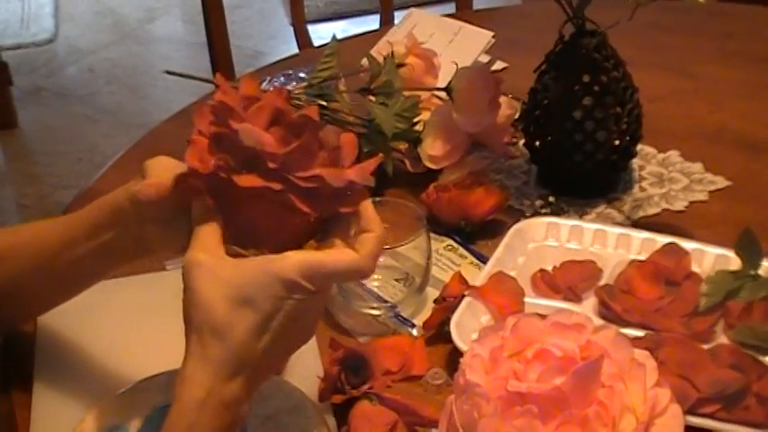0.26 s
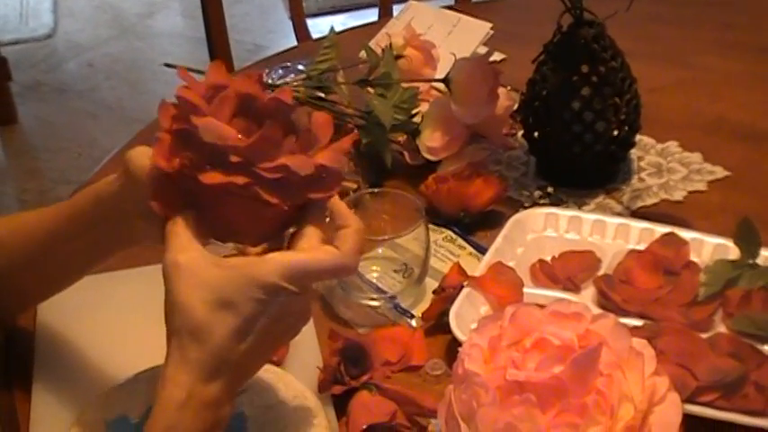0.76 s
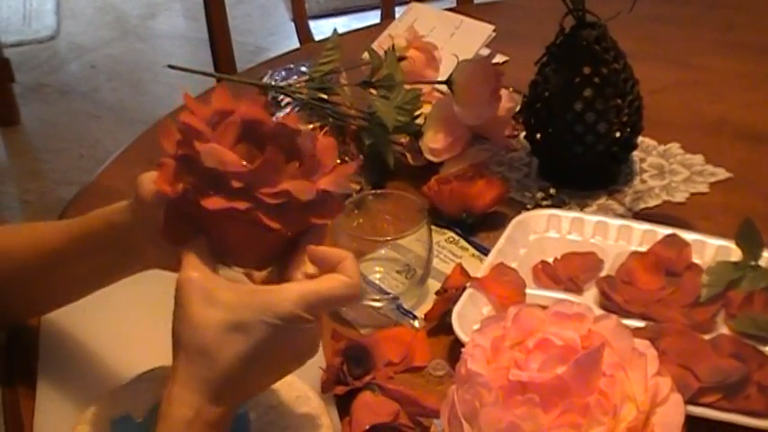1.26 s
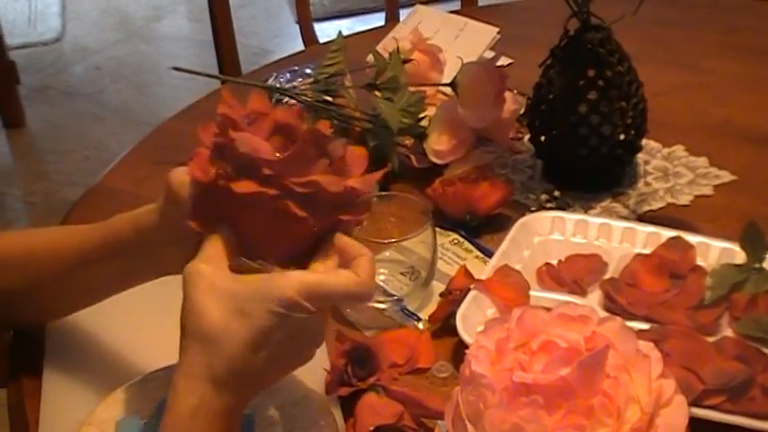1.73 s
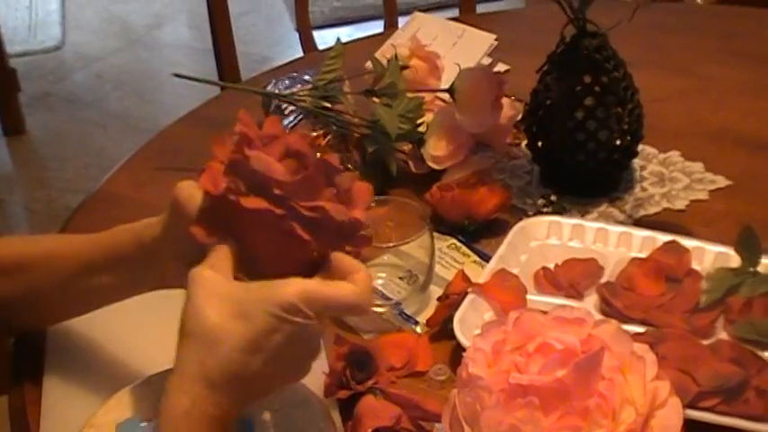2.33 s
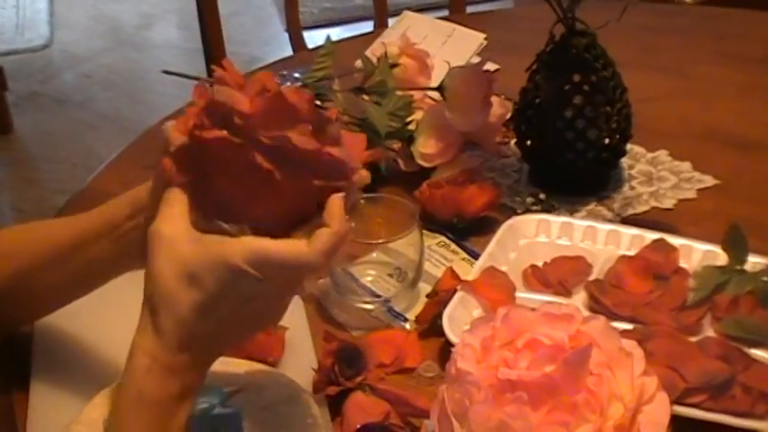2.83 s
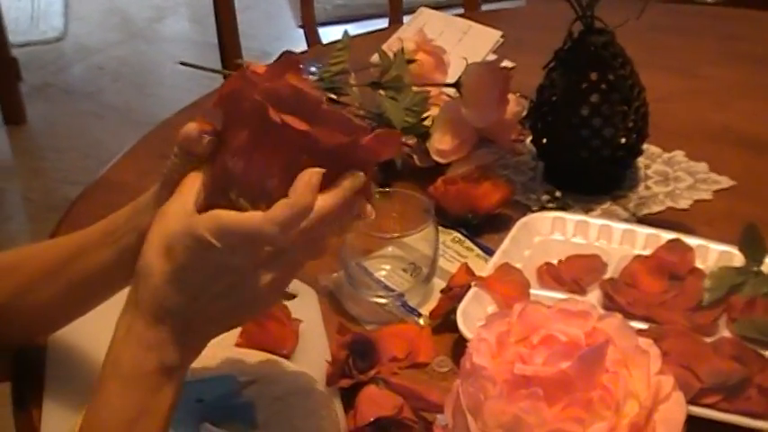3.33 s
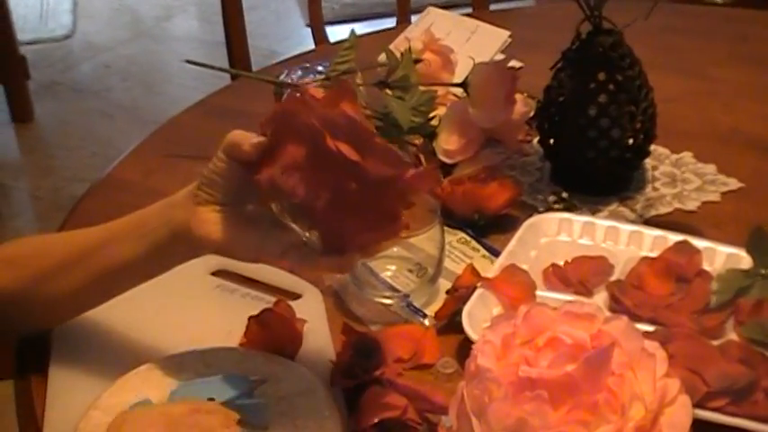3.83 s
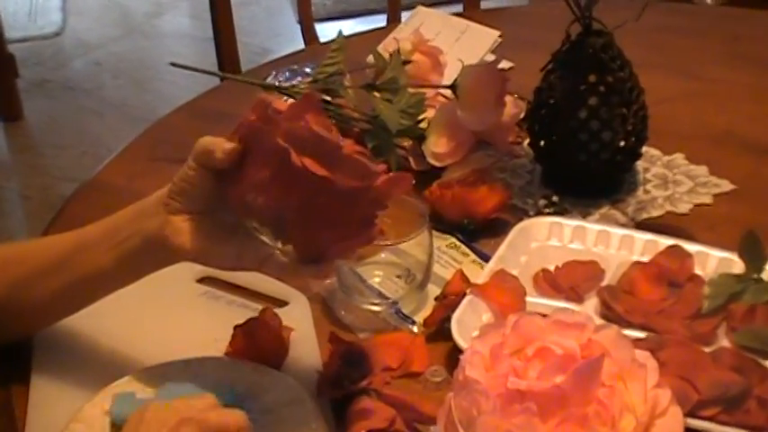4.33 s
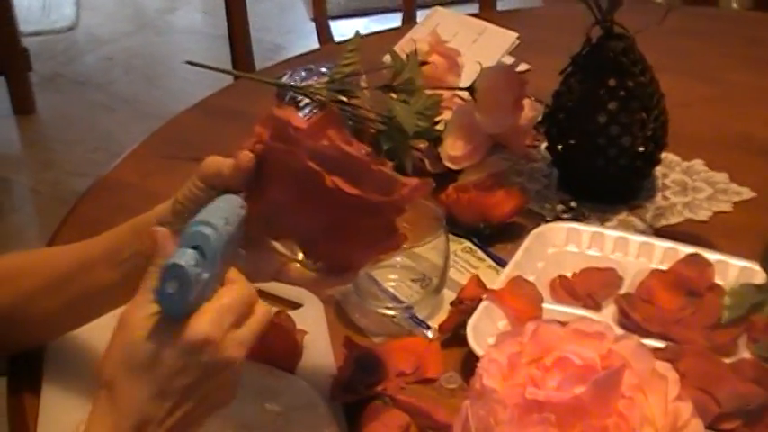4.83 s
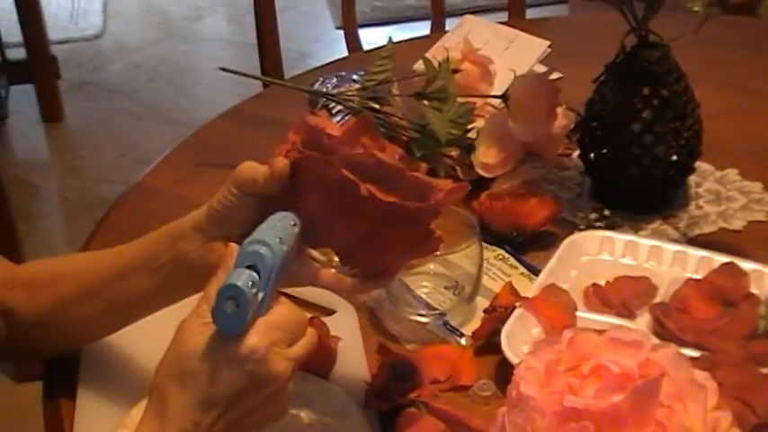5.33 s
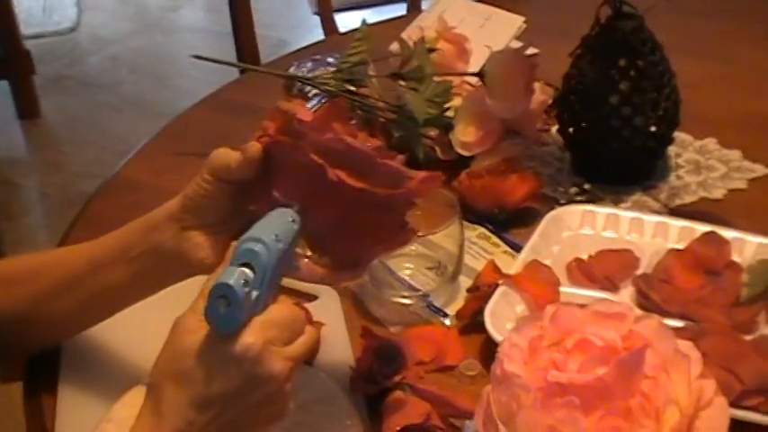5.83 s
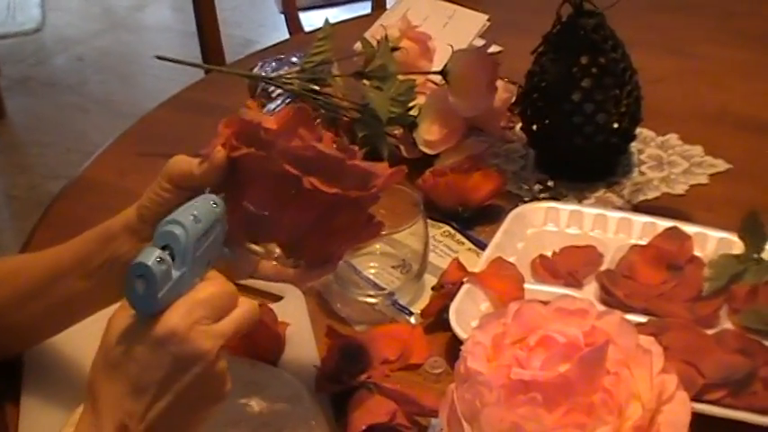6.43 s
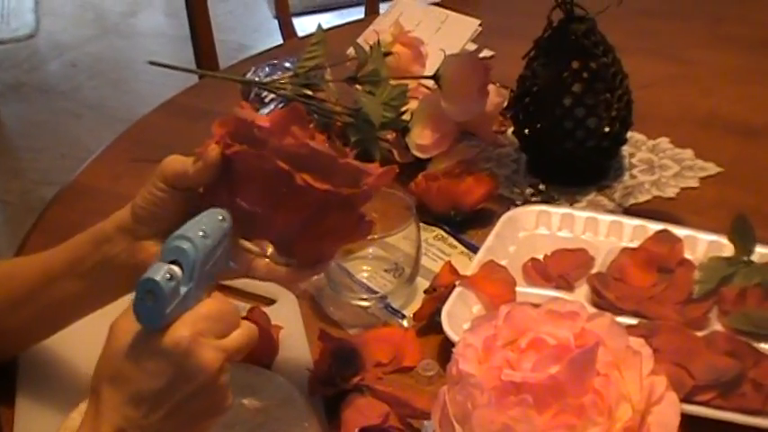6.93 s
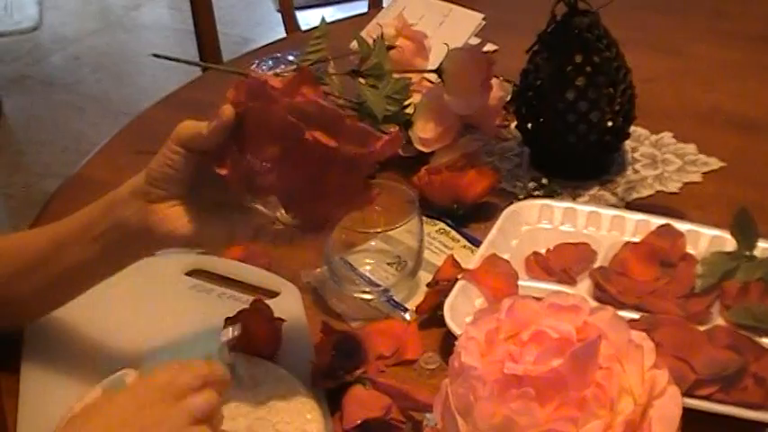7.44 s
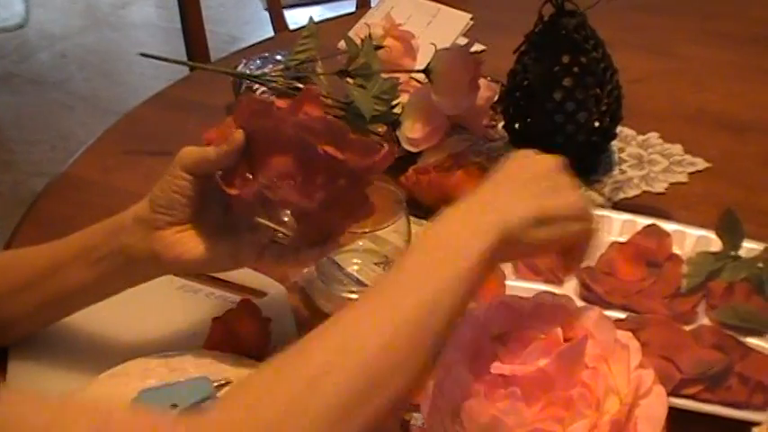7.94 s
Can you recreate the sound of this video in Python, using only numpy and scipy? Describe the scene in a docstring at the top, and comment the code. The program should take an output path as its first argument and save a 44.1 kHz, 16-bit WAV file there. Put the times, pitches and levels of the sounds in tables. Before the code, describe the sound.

Close up at a wooden table, hands turn a silk flower with soft, grainy, hissing rustles and a few tiny ticks. Midway a plastic glue gun is picked up with light clicks and faint ceramic tings, then one sharp snap. After a quiet stretch it clatters back onto a dish with a loud clack, thump and short ring. A low steady motor and fan hum with soft air noise fills the lively, hard-walled room.

```python
"""Hands turn a silk flower and rustle its petals: grainy, hissing noise swells with every stroke.
A plastic glue gun and fingernails click (short pitched rattles) at a wooden table (a bank of resonances).
The gun squeaks faintly, rings a ceramic dish (decaying sines) and lands with a thump (one short push).
A hard-walled room answers with early reflections and a noise tail.
An appliance motor and a fan hum (wavering sines) over the rush of air (coloured noise)."""
import sys
import numpy as np
from scipy import signal
from scipy.fft import rfft, irfft, next_fast_len
from scipy.io import wavfile
from scipy.ndimage import map_coordinates

SR = 44100
rng = np.random.default_rng(int(sys.argv[2]) if len(sys.argv) > 2 else 0)


def field_ratio(decibels):
    """Amplitude ratio for a level in dB (20 dB per decade); scalars and array-likes work."""
    return 10 ** (np.asarray(decibels, dtype=float) / 20)


def inscribe(sig):
    """Save sig as 16-bit PCM at rate SR to the path in sys.argv[1].

    A 1-D sig is mono; a 2-D sig holds one channel per row.
    Samples are clipped to [-1, 1] before scaling.
    """
    pcm = np.round(np.clip(np.atleast_2d(sig).T, -1, 1) * 32767)
    wavfile.write(sys.argv[1], SR, pcm.astype(np.int16))


N = 360730  # length in samples

# Fingers slide over silk or plastic. Each row: peak time in seconds, rise in seconds, fall in seconds,
# rustle level in dB, dull scrape against the rustle in dB.
HAND_STROKES = [(.04, 0.13, 0.077, -55.5, -6.5), (.25, 0.12, 0.16, -64.5, -4),
                (.53, 0.075, 0.077, -58, -10), (.71, .04, .07, -69, -2), (.815, 0.04, 0.076, -65.5, -6),
                (1.03, 0.026, 0.057, -70, 0), (1.2, .1, 0.032, -68.5, -12),
                (1.43, 0.038, 0.053, -51.5, -13.5), (1.72, 0.036, 0.033, -57, -16),
                (2.22, 0.031, 0.018, -59.5, -11), (2.34, 0.031, 0.12, -58, -11),
                (2.51, 0.076, 0.056, -57, -6.5), (2.65, 0.042, 0.059, -53.5, -8.5),
                (2.8, 0.018, 0.032, -54, -13), (2.88, .05, 0.12, -58, -8), (3.36, 0.035, 0.059, -56, -7),
                (3.755, 0.035, 0.012, -62, 2.5), (3.826, 0.041, 0.01, -57.5, -1), (3.93, 0.068, .2, -68, 2),
                (4.05, 0.072, 0.022, -60, -6), (4.18, 0.059, 0.083, -58.5, -5),
                (4.245, 0.019, 0.025, -59, 7), (4.33, .1, 0.068, -60.5, 0),
                (4.455, 0.097, 0.095, -54.5, -0.5), (4.77, 0.13, 0.1, -58, -6), (5.15, 0.22, 0.1, -73, 6),
                (5.49, .06, 0.037, -68.5, 7), (5.556, 0.088, 0.089, -68, 0.5),
                (5.98, 0.067, 0.06, -64, 10.5), (6.992, .02, .02, -71, -11), (6.06, 0.044, 0.048, -72, 13),
                (7.14, 0.096, 0.12, -61, 3.5), (7.33, 0.06, 0.28, -62, 6.5), (7.437, 0.028, 0.025, -51, 3),
                (7.49, 0.062, 0.66, -58, 1)]
# Light contact of the hands between strokes. Each row: time in seconds, rustle level in dB,
# dull scrape against the rustle in dB.
HAND_GRIP = [(0, -76.5, 5.5), (1.35, -69.5, -3.5), (1.55, -80, 3), (2.1, -75.5, -5), (3.05, -65, -3),
             (3.3, -68, -5), (3.47, -77.5, 2), (3.7, -70.5, 0.5), (4.9, -70, 5.5), (5.2, -86, 5.5),
             (6.1, -80, 9.5), (6.9, -85.5, 8.5), (7.8, -92, 10), (8.18, -77, 7)]
# Clicks of plastic and fingernails. Each row: start in seconds, level in dB, centre in Hz,
# table knock level in dB, time to fall 60 dB in seconds.
PLASTIC_CLICKS = [(1.0206, -47, 7000, -66, 0.005), (1.04, -38.5, 7840, -57, 0.018),
                  (2.52, -47, 3500, -62, 0.005), (2.64, -45, 2800, -60, 0.006),
                  (2.782, -41, 7650, -67, 0.0074), (2.803, -46, 7600, -69, 0.0099),
                  (3.385, -49, 3000, -60, 0.005), (3.726, -44, 4740, -65, 0.0066),
                  (3.7453, -36.5, 4800, -63, 0.011), (3.807, -42, 4810, -66, 0.0098),
                  (3.825, -48, 8160, -65, 0.01), (3.998, -43.5, 3120, -58, 0.008),
                  (4.0971, -46, 8060, -65, 0.006), (4.1545, -45, 2490, -50, 0.0086),
                  (4.2424, -38.5, 2300, -45, 0.0082), (4.455, -38, 2980, -58, 0.0057),
                  (4.5404, -41, 2470, -49, 0.011), (4.6963, -40, 2560, -48, 0.006),
                  (4.964, -34.5, 2820, -52, 0.0089), (5.035, -22, 3250, -42, 0.006),
                  (5.2517, -7.5, 3940, -36, 0.0048), (5.905, -30.5, 2350, -32, 0.0039),
                  (5.93, -45, 5500, -60, 0.006), (5.939, -30.5, 2530, -44, 0.011),
                  (5.9578, -22, 7500, -41, 0.0052), (5.9729, -29, 2720, -42, 0.0078),
                  (5.9748, -24, 2350, -45, 0.024), (6.0025, -38, 7000, -52, 0.005),
                  (6.0685, -39, 2330, -48, 0.019), (6.4218, -25, 3220, -46.5, 0.0044),
                  (6.5735, -40, 5900, -75, 0.0055), (7.0524, -39, 2320, -38.5, 0.011),
                  (7.081, -49, 7000, -58, 0.0054), (7.0917, -38, 3230, -55, 0.007),
                  (7.1172, -31, 2870, -52, 0.0086), (7.131, -29.5, 2500, -44, 0.024),
                  (7.237, -45, 2520, -49, 0.0068), (7.302, -41, 2820, -50, 0.0049),
                  (7.34, -28, 3030, -41.5, 0.018), (7.3687, -37, 2500, -43, 0.047),
                  (7.434, -37, 2440, -45, 0.004), (7.496, 0, 3600, -20.5, 0.003),
                  (7.5203, -13, 3570, -28.5, 0.0083), (7.6043, -11.5, 3200, -33, 0.0079),
                  (7.611, -4.5, 3400, -28, 0.012)]
# The table top under a knock. Each row: resonance in Hz, width in Hz, relative level in dB.
TABLE_MODES = [(410, 190, -13), (634, 160, -4), (832, 150, 0), (1034, 74, 7.5), (1149, 22, 11),
               (1287, 54, 10), (1480, 62, 7)]
# The gun touches the dish. Each row: start in seconds, ring level in dB,
# lift of the modes above 4 kHz in dB.
DISH_TOUCHES = [(3.726, -55, 1), (3.7475, -62, 19), (3.81, -64, 13), (3.822, -52, 0), (3.978, -59, -6),
                (4.0201, -62, -6), (7.4962, -30, -6), (7.6115, -19.5, 0)]
# Ringing modes of the dish. Each row: pitch in Hz, relative level in dB, time to fall 60 dB in seconds.
DISH_MODES = [(2089, 0, .27), (2090, -13, .5), (2123, -20, .2), (3495, -7, .11), (4790, -11, .12),
              (4793, -21, .45), (6051, -26, .25), (7780, -22, .08), (8100, -24, .08)]
# First reflections in the room. Each row: delay in seconds, level in dB.
WALL_ECHOES = [(.0032, -21), (.0085, -25), (.0133, -25), (.0172, -14), (.029, -24), (.034, -22)]
# Decay of the room tail. Each row: frequency in Hz, time to fall 60 dB in seconds.
ROOM_DECAY = [(500, 0.34), (1200, 1), (2200, 0.49), (5000, 0.46), (10000, 0.26), (13000, 0.13),
              (16000, 0.064)]
# Stereo width of the room tail. Each row: frequency in Hz, left-right likeness (1 = identical).
ROOM_LIKENESS = [(500, 0.98), (2000, 0.87), (4500, 0.86), (8000, 0.36), (12000, 0.095)]
# Microphone response to close sounds. Each row: frequency in Hz, gain in dB.
MIC_RESPONSE = [(1000, 1), (9000, -2), (16000, -33.5)]
# Mains buzz. Each row: multiple of its base pitch, level in dB.
MAINS_HARMONICS = [(1, -54.5), (2, -58), (3, -85.5), (5, -77)]
# Shaft orders of the motor. Each row: multiple of its base pitch, level in dB.
MOTOR_ORDERS = [(1, -75), (2, -72), (3, -74), (4, -66.5), (5, -66), (6, -76.5), (7, -71), (8, -71.5),
                (9, -96)]
# Weaker tones beside them. Each row: pitch in Hz, level in dB.
WEAK_TONES = [(76.6, -75), (111.35, -75), (117.84, -70), (177.97, -71), (180.95, -72), (297.97, -73),
              (348.2, -76), (418, -78)]
# Colour of the room air. Each row: frequency in Hz, relative level in dB.
AIR_COLOUR = [(15, -50), (30, -27), (50, -14), (140, -15), (255, -9.5), (330, -14), (430, -13.5),
              (560, -18), (690, -16), (1200, -24), (1650, -28), (7300, -44), (14000, -54), (16000, -66.5)]
# Stereo width of the room air. Each row: frequency in Hz, left-right likeness (below 0 = opposed).
AIR_LIKENESS = [(60, 0.42), (150, 0.4), (380, 0.41), (950, 0.076), (2380, -0.46), (5980, -0.32),
                (15000, -0.1)]


def unit(x):
    """Scales a signal to rms 1."""
    return x / np.sqrt(np.mean(x ** 2) + 1e-20)


def along(points, hz):
    """Reads a curve of (Hz, value) points on a log frequency axis."""
    f, value = np.transpose(points)
    return np.interp(np.log(hz + 1), np.log(f + 1), value)


def wobble(rate):
    """Draws a smooth random curve with rate knots a second."""
    knots = rng.standard_normal(int(N * rate / SR) + 4)
    return map_coordinates(knots, [np.arange(N) * rate / SR])


def filtered(x, response):
    """Multiplies the spectrum of x by a complex response of frequency."""
    m = next_fast_len(x.shape[-1] + 8192)
    return irfft(rfft(x, m) * response(np.fft.rfftfreq(m, 1 / SR)), m)[..., :x.shape[-1]]


def peak(f, hz, width):
    """Response of a causal resonance at hz."""
    return 1j * f * width / (hz * hz - f * f + 1j * f * width)


def spread(pair, spectrum, likeness):
    """Makes two unrelated signals into a coloured left and right of the given likeness."""
    def mid_side_gains(hz):
        turn = np.arccos(np.clip(along(likeness, hz), -1, 1)) / 2
        return field_ratio(along(spectrum, hz)) * [np.cos(turn), np.sin(turn)]
    mid, side = filtered(pair, mid_side_gains)
    return np.array([mid + side, mid - side])


def petals():
    """Fibres slip in dense tiny grains over a hiss; a duller scrape and ticking petal edges join in."""
    fidget_db, fidget_rate = 3.5, 9.6  # the grip shifts at random: depth, knots a second
    swell_db, roundness = 15, 2.2  # level gained over a rise and lost over a fall; 1 = pointed peak
    sheen_db = 9  # strokes lift the top of the rustle against the resting grip
    slip_rate = 1500  # fibre slips a second
    crackle_rate, crackle_db, crackle_spread_db = 18, 32, 3  # ticks a second, strength, scatter

    t = np.arange(N) / SR
    times, grip_db, grip_dull_db = np.transpose(HAND_GRIP)
    grip = field_ratio(np.interp(t, times, grip_db) + fidget_db * wobble(fidget_rate))
    rustle, sheen = grip, grip
    scrape = grip * field_ratio(np.interp(t, times, grip_dull_db))
    for s, rise, fall, db, dull_db in HAND_STROKES:
        distance = np.maximum((s - t) / rise, (t - s) / fall)
        stroke = field_ratio(db - swell_db * distance ** roundness)
        rustle = np.hypot(rustle, stroke)
        scrape = np.hypot(scrape, field_ratio(dull_db) * stroke)
        sheen = np.hypot(sheen, field_ratio(sheen_db) * stroke)

    strength = field_ratio(2.2 * rng.exponential(size=(3, N))) * rng.standard_normal((3, N))
    slips = (rng.random((3, N)) < slip_rate / SR) * strength
    hiss = rng.standard_normal((3, N))
    grain = field_ratio(1.1 * wobble(40)) * (hiss + .4 * unit(slips))
    dull = unit(filtered(grain[0], lambda f: peak(f, 1800, 4400) * peak(f, 2100, 7900)))
    bright = unit(filtered(grain[1], lambda f: peak(f, 7180, 2000)))
    top = unit(filtered(grain[2], lambda f: peak(f, 12300, 7000) ** 2))

    # stiff petal edges let go
    tick_level = field_ratio(crackle_db + crackle_spread_db * rng.standard_normal(N))
    ticks = (rng.random(N) < crackle_rate / SR) * tick_level
    crackle = filtered(grip * ticks, lambda f: peak(f, 7500, 6000) ** 2)
    return rustle * bright + field_ratio(-9) * sheen * top + scrape * dull + crackle


def clicks():
    """A click is a sharp edge and a few milliseconds of rattle around its own pitch, plus a table knock.
    Second row: the same energy as radiated to all sides, where the rattle's random comb averages out."""
    out, t = np.zeros((2, N + 4096)), np.arange(4096) / SR
    small = signal.butter(4, 1800, "high", fs=SR, output="sos")  # small parts radiate no bass
    blunt = signal.butter(2, 11000, fs=SR, output="sos")  # contact time dulls the top
    edge = 1. * (t == 0)

    def wood(f):
        return sum((-1) ** k * field_ratio(db) * peak(f, hz, width)
                   for k, (hz, width, db) in enumerate(TABLE_MODES))

    for s, db, hz, knock_db, t60 in PLASTIC_CLICKS:
        def body(f):
            return peak(f, hz, 0.58 * hz) + 0.17 * peak(f, 6100, 10000) - 0.13 * peak(f, 1900, 1300)

        onset = 1 - np.exp(-t / (0.052 * t60))
        rattle = rng.standard_normal(len(t)) * field_ratio(-60 * t / t60) * onset
        direct = rattle / np.linalg.norm(rattle) + edge * min(0.0018 / t60, 1.5)
        burst = np.array([direct, edge])
        snap = signal.sosfilt(np.vstack([small, blunt]), filtered(burst, body))
        knock = filtered(burst, wood)
        for part, part_db in (snap, db), (knock, knock_db):
            even = np.linalg.norm(part[0]) / np.linalg.norm(part, axis=1)  # equal energy in both rows
            level = field_ratio(part_db) / abs(part[0]).max()
            out[:, round(s * SR):][:, :len(t)] += level * part * even[:, None]
    return out[:, :N]


def squeak():
    """The gun's foot rubs on the glaze: a faint rising whistle."""
    start, length = 3.87, .11  # seconds
    from_hz, to_hz, db = 4800, 5900, -69
    u = np.clip((np.arange(N) / SR - start) / length, 0, 1)
    cycles = np.cumsum(from_hz + (to_hz - from_hz) * u ** 2) / SR
    return field_ratio(db) * np.sin(np.pi * u) * np.sin(2 * np.pi * cycles)


def dish():
    """Every touch rings the dish's modes; each touch weights the upper ones its own way."""
    out, t = np.zeros(N + SR), np.arange(SR // 2) / SR
    onset = 1 - np.exp(-t / 0.00047)
    for s, db, upper_db in DISH_TOUCHES:
        ring = sum(field_ratio(mode_db + upper_db * (hz > 4000) - 60 * t / t60) * np.sin(2 * np.pi * hz * t)
                   for hz, mode_db, t60 in DISH_MODES)
        out[round(s * SR):][:len(t)] += field_ratio(db) * ring * onset
    return out[:N]


def thump():
    """The gun's weight lands on the table: one short push, all bass and middle."""
    start, push, db = 7.4958, .0003, -29  # seconds, seconds to the peak, level
    u = np.clip(np.arange(N) / SR - start, 0, None) / push
    return field_ratio(db) * u * np.exp(1 - u)


def table_bounce(x):
    """Adds the table's mirror image of a click, a delayed weaker copy."""
    delay, db = 0.000384, -14  # seconds, level
    return filtered(x, lambda hz: 1 + field_ratio(db) * np.exp(-2j * np.pi * hz * delay))


def walls(x):
    """First reflections off table, wall and ceiling are delayed, weaker copies."""
    return sum(field_ratio(db) * np.pad(x, (round(s * SR), 0))[:N] for s, db in WALL_ECHOES)


def microphone(x):
    """Colours the close sounds and lets them reach the left side slightly first."""
    lead = 8e-6  # seconds
    sides = np.array([[1], [-1]])
    return filtered(x, lambda hz: field_ratio(along(MIC_RESPONSE, hz)) * np.exp(1j * np.pi * hz * lead * sides))


def room(x):
    """A diffuse noise tail follows, in which each frequency dies at its own speed."""
    hz, t, z = signal.stft(rng.standard_normal((2, SR)), SR, nperseg=256)
    decay = field_ratio(-60 * t / along(ROOM_DECAY, hz)[:, None])
    tail = signal.istft(z * decay, SR, nperseg=256)[1]
    late = np.pad(x, (130, 0))  # samples before the tail sets in
    pair = signal.fftconvolve(late[None], tail / np.linalg.norm(tail[0]), axes=1)[:, :N]
    return spread(pair, [(1000, 0.005)], ROOM_LIKENESS)  # flat colour


def tone(hz, db, waver_db):
    """A steady sine whose level wavers a little."""
    level = np.sqrt(2) * field_ratio(db + waver_db * wobble(2.6))
    return level * np.sin(2 * np.pi * (hz * np.arange(N) / SR + rng.random()))


def hum():
    """Mains buzz, the motor's shaft orders, the fan's blade tone and weaker tones, all wavering sines."""
    mains_hz, motor_hz, fan_hz = 120, 58.57, 229.86
    mains = sum(tone(k * mains_hz, db, waver_db=.3) for k, db in MAINS_HARMONICS)
    motor = sum(tone(k * motor_hz, db, waver_db=2.5) for k, db in MOTOR_ORDERS)
    fan = tone(fan_hz, -53.5, waver_db=.4)
    others = sum(tone(hz, db, waver_db=1.5) for hz, db in WEAK_TONES)
    return mains + motor + fan + others


def air():
    """Room air is coloured noise, partly alike on both sides in the bass and partly opposed higher up."""
    return field_ratio(-53) * unit(spread(rng.standard_normal((2, N)), AIR_COLOUR, AIR_LIKENESS))


def scene():
    """Hands close by, near the middle; hum and air all around."""
    silk, ring = petals() + squeak(), dish()
    snaps, radiated = table_bounce(clicks())
    hands = silk + snaps + thump()
    near = microphone(hands + walls(hands) + ring)
    far = field_ratio(-13.5) * room(silk + radiated + field_ratio(-8) * ring)
    hum_balance = field_ratio([[-.2], [.2]])  # a touch stronger on the right
    return near + far + hum() * hum_balance + air()


def low_pass(x):
    """Removes everything above the highest recorded frequency."""
    return signal.sosfilt(signal.butter(12, 16810, fs=SR, output="sos"), x)


def record(dry):
    """Delivers the finished mix."""
    return low_pass(dry)


dry = scene()
out = record(dry)
inscribe(out)
```